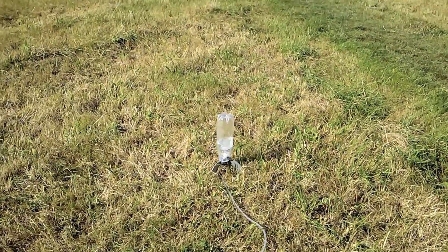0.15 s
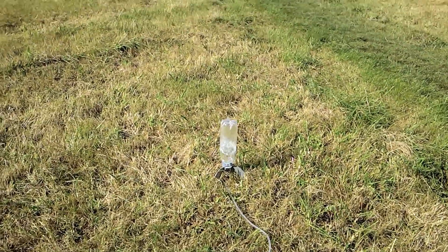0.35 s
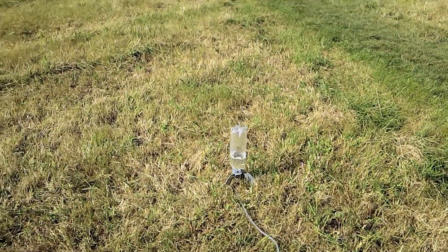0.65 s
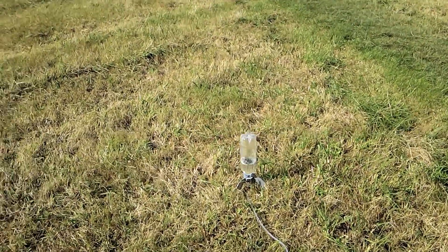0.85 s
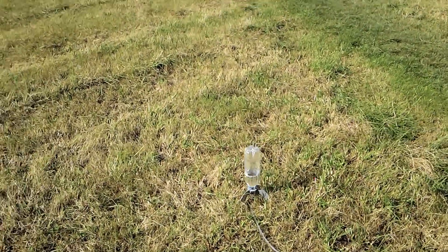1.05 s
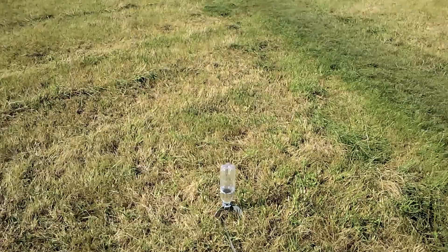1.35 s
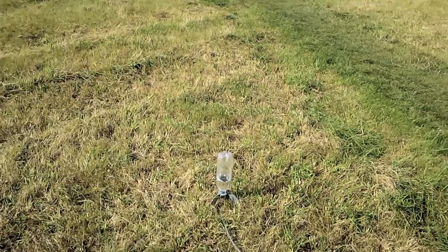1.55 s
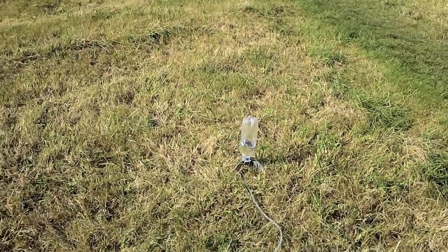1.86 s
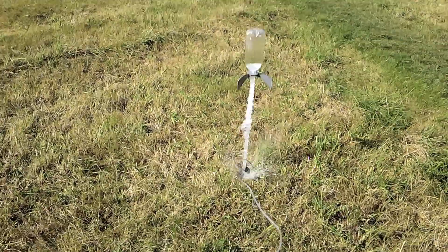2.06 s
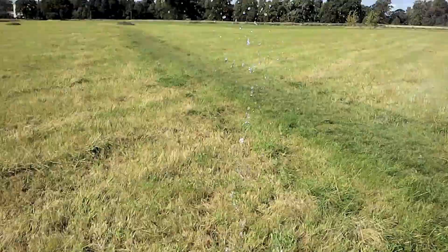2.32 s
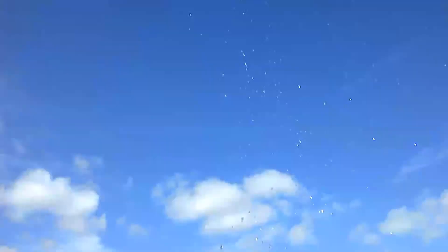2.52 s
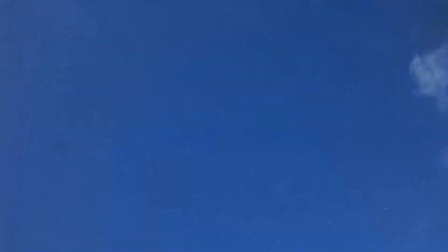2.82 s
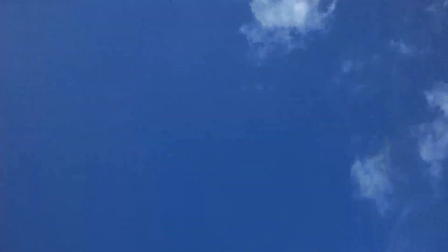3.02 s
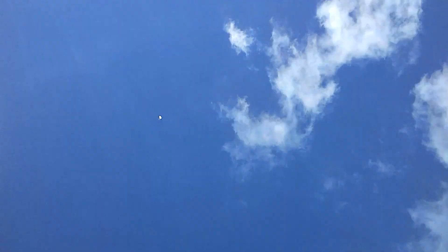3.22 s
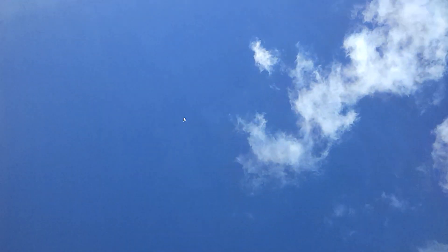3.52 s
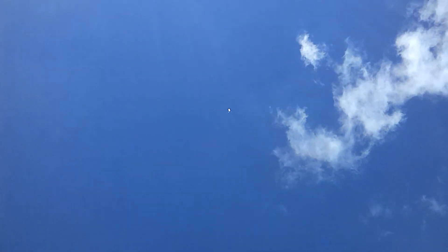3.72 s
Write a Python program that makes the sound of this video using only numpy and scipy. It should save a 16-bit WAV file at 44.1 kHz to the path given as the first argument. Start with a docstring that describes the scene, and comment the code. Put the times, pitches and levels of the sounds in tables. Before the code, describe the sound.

A water bottle rocket waits in a windy grass field with faint ticks and hisses, then pops loose with a split-second wet whoosh and spray patter; low wind keeps buffeting the close, unprotected microphone.

```python
"""A water rocket launches from a grass field while gusts buffet the microphone.
Throughout, filtered noise makes the wind and hissing grass, and short noise bursts make the thuds of eddies.
Hose and launcher tick, thin leaks hiss as gliding resonances, and the bottle neck creaks in tiny jerks.
At two seconds a pulse pops the bottle free amid a jet of water noise, then the last air blasts out,
both with a ground echo; a rain of tiny random hits is the spray, and two stray drops land close by."""
import sys
import numpy as np
from scipy import signal
from scipy.fft import rfft, irfft
from scipy.io import wavfile

SR = 44100
rng = np.random.default_rng(int(sys.argv[2]) if len(sys.argv) > 2 else 0)


def persist_wave(psi):
    """Save psi, clipped to +-1, as 16-bit WAV."""
    counts = np.round(np.clip(psi, -1, 1) * 32767).astype(np.int16)
    wavfile.write(sys.argv[1], SR, np.atleast_2d(counts).T)


N = 171108  # length in samples
T = np.arange(N) / SR  # time of each sample in seconds
POP_S = 2.0225  # moment the bottle pops free

# tone of small dry clicks, for grass crackles and launcher ticks: f/Hz, level/dB
CLICK_COLOUR = [(500,-7),(2200,10.5),(5000,2),(9000,-0.5),(15000,-21)]


def amp(db):
    """Turns decibels into a gain."""
    return 10 ** (np.asarray(db) / 20)


def unit(x):
    """Scales a sound to an rms (average strength) of 1."""
    return x / np.sqrt(np.mean(x ** 2) + 1e-20)


def level(points):
    """Gain over time, drawn through (t/s, level/dB) points."""
    return amp(np.interp(T, *np.transpose(points)))


def burst(points):
    """Gain over time like level, but practically silent outside its points."""
    return amp(np.interp(T, *np.transpose(points), left=-150, right=-150))


def colour(x, points):
    """Filters a sound to the spectrum in (f/Hz, level/dB) points, without ringing ahead of time."""
    f, db = np.transpose(points)
    hz = abs(np.fft.fftfreq(4096, 1 / SR))
    log_gain = np.log(amp(np.interp(np.log(hz + 1), np.log(f), db)))
    # the Hilbert transform finds the phase that puts the filter's energy as early as possible
    spectrum = np.exp(np.conj(signal.hilbert(log_gain)))
    taps = np.fft.ifft(spectrum).real
    return signal.fftconvolve(x, taps)[:len(x)]


def noise(points):
    """Coloured noise of rms 1."""
    return unit(colour(rng.standard_normal(N), points))


def wander(top_hz):
    """Random motion of rms 1, mostly slower than top_hz, with softly limited peaks."""
    hz = np.fft.rfftfreq(N, 1 / SR)
    drop_slowest = hz / (hz + top_hz / 4)
    drop_fastest = 1 / np.sqrt(1 + (hz / top_hz) ** 4)
    motion = irfft(rfft(rng.standard_normal(N)) * drop_slowest * drop_fastest, N)
    return unit(np.tanh(.5 * unit(motion)))


def resonate(x, hz, width_hz):
    """A steep resonance of rms 1 around hz, which may move."""
    turn = np.exp(2j * np.pi * np.cumsum(hz * np.ones(len(x))) / SR)
    pole = np.exp(-np.pi * width_hz / SR)
    # shift the resonance down to 0 Hz, smooth twice, shift it back up
    smoothed = signal.lfilter([1], np.poly([pole, pole]), x / turn)
    return unit((turn * smoothed).real)


def snap(points):
    """One sharp pressure pulse of peak 1."""
    pulse = colour(signal.unit_impulse(2048), points)
    return pulse / abs(pulse).max()


def add(mix, s, sound):
    """Mixes a sound in at time s, cutting what runs past the end."""
    part = mix[round(s * SR):][:len(sound)]
    part += sound[:len(part)]


def wind():
    """Turbulent eddies at the microphone make bass, rumble and flutter swell together."""
    # strength of the gusts: t/s, level/dB
    gusts = [(0,-15.5),(.07,-35),(.11,-22.5),(.33,-23),(.44,-24),(.93,-23),(1.09,-30.5),(1.38,-29.5),(1.49,-18),(1.62,-26),(1.77,-19),(1.87,-26),(1.98,-18.5),(2.05,-43.5),(2.23,-26.5),(2.53,-33.5),(2.7,-26),(2.81,-31),(3.0,-19.5),(3.26,-15.5),(3.6,-26),(3.69,-16),(3.88,-31.5)]
    # balance of the wind: t/s, deep bass before joint scaling/dB, flutter relative to rumble/dB
    wind_tone = [(.9,-6,-16),(1.9,-5,-25),(2.449,-2,-17.5),(3.249,-12.5,-14),(3.8,-13.5,-18)]
    # spectra of deep bass, rumble and flutter: f/Hz, level/dB
    deep_colour = [(30,-21),(70,13),(130,10),(1500,-94.5)]
    rumble_colour = [(25,-42),(65,-11),(130,1),(320,-6.5),(480,-17.5),(800,-42),(3200,-99.5)]
    flutter_colour = [(100,-9),(500,1),(750,-6.5),(1000,-15),(1600,-27.5),(2500,-40.5),(14000,-81.5)]
    eddy_hz, eddy_db = 33, 1.86  # speed of the eddies, depth in the rumble
    flutter_db, own_flutter_db, own_flutter_hz = 2.5, 2.5, 111  # depth with the eddies, depth and speed alone

    eddies = wander(eddy_hz)
    s, deep_tone_db, flutter_tone_db = np.transpose(wind_tone)
    deep = amp(np.interp(T, s, deep_tone_db)) * noise(deep_colour)
    rumble = unit((noise(rumble_colour) + deep) * amp(eddy_db * eddies))
    flutter_swing_db = flutter_db * eddies + own_flutter_db * wander(own_flutter_hz)
    flutter = unit(noise(flutter_colour) * amp(flutter_swing_db))
    return level(gusts) * (rumble + amp(np.interp(T, s, flutter_tone_db)) * flutter)


def grass():
    """Dry grass hisses and crackles faintly in the wind: steady noise plus sparse random clicks."""
    # strength of the hiss: t/s, level/dB
    hiss = [(.22,-55),(.43,-64),(.65,-58),(1.0,-57),(1.12,-60),(1.4,-56.5),(1.95,-57.5),(2.32,-68),(3.15,-64.5),(3.42,-67)]
    # spectrum of the hiss: f/Hz, level/dB
    hiss_colour = [(1200,8),(2300,-1.5),(3500,-0.5),(8500,-6),(11000,-13.5),(15500,-20.5)]
    crackles_per_s, crackle_db, spread_db = 90, -9.5, 3  # rate, level below the hiss, spread in strength

    happens = rng.random(N) < crackles_per_s / SR
    strength = amp(spread_db * np.minimum(rng.exponential(1, N), 3))
    crackle = unit(colour(happens * strength, CLICK_COLOUR))
    return level(hiss) * (noise(hiss_colour) + amp(crackle_db) * crackle)


def thuds():
    """Strong eddies hit the microphone: a quick push that dies away, brighter for small eddies."""
    # single eddies: t/s, level/dB, treble corner f/Hz
    buffets = [(.024,-18,660),(.246,-10.5,600),(.288,-15,360),(.338,-12,420),(.392,-21.5,640),(.574,-14.5,360),(.614,-15.5,440),(.663,-20,620),(.8,-20,520),(.884,-18.5,680),(.903,-19.5,720),(.987,-14,660),(1.02,-14.5,340),(1.265,-21,500),(1.325,-20,540),(1.475,-16,540),(1.55,-17,640),(1.679,-15.5,260),(1.72,-17,500),(1.756,-15.5,500),(1.823,-16,440),(1.89,-15.5,300),(1.951,-13,360),(2.426,-29,780),(2.671,-21,540),(2.691,-28,850),(3.135,-17.5,600),(3.275,-15.5,560)]
    # spectrum of an eddy: multiple of its corner frequency, level/dB
    buffet_colour = [(.07,-11),(.28,0),(1.05,-10.5),(6,-85)]
    peak_s = .0055  # time for the push to reach its peak

    out = np.zeros(N)
    u = np.arange(SR // 20) / SR / peak_s
    swell = u * np.exp(1 - u)
    for s, db, corner_hz in buffets:
        grit = swell * rng.standard_normal(len(u))
        push = colour(grit, np.multiply(buffet_colour, (corner_hz, 1)))
        # equal energy before the level is set, whatever the corner
        add(out, s, amp(db) * push * np.linalg.norm(swell) / np.linalg.norm(push))
    return out


def ticks():
    """Hose and launcher tick under pressure: a dry noise click plus a short ring, both dying away."""
    # ticks: t/s, level before the fade/dB, ring f/Hz
    tick_list = [(.166,-42,3630),(.176,-46,2100),(.264,-51,3700),(0.31,-47,6100),(.327,-51,9100),(0.513,-42,2000),(.593,-41,2650),(.638,-51,4500),(.679,-48.5,8500),(1.048,-45,4030),(1.165,-43.5,7400),(1.185,-51,8100)]
    rise_s, decay_s = 0.00084, 0.0037
    ring_width_hz, ring_db = 1090, -2.5  # ring level is relative to the click

    out, t = np.zeros(N), np.arange(SR // 20) / SR
    fade = np.minimum(t / rise_s, 1) * np.exp(-t / decay_s)
    for s, db, hz in tick_list:
        grit = rng.standard_normal(len(t))
        click = unit(colour(grit, CLICK_COLOUR))
        ring = amp(ring_db) * resonate(grit, hz, ring_width_hz)
        add(out, s, amp(db) * (click + ring) * fade)
    return out


def leaks():
    """Air escapes the pressurised launcher: thin hisses that glide in pitch and spit in strength."""
    # leaks: t/s, length/s, level before fades and spitting/dB, start f/Hz, end f/Hz
    leak_list = [(.69,0.35,-69.5,7150,7750),(.92,0.11,-61,2400,2080),(1.33,.08,-63,3020,3180)]
    width_hz, spit_db, spit_hz = 460, 4.0, 55  # width of each hiss, depth and speed of the spitting

    out = np.zeros(N)
    spits = unit(amp(spit_db * wander(spit_hz)))
    for s, length_s, db, start_hz, end_hz in leak_list:
        window = signal.windows.tukey(int(length_s * SR), .5)  # fades in and out
        glide_hz = np.linspace(start_hz, end_hz, len(window))
        hiss = resonate(rng.standard_normal(len(window)), glide_hz, width_hz)
        add(out, s, amp(db) * window * hiss * spits[round(s * SR):][:len(window)])
    return out


def creak():
    """The bottle neck slips on its seal in tiny jerks just before it lets go, exciting resonances."""
    # strength of the creak: t/s, level/dB
    creak_level = [(1.91,-67),(1.93,-51),(1.965,-54.5),(2.02,-56)]
    # resonances: f/Hz, level relative to each other/dB
    modes = [(1850,-1),(3900,-4.5),(5350,-3.5)]
    slips_per_s, width_hz = 900, 1400

    slips = (rng.random(N) < slips_per_s / SR) * rng.standard_normal(N)
    rings = sum(amp(db) * resonate(slips, hz, width_hz) for hz, db in modes)
    return burst(creak_level) * unit(rings)


def jet():
    """Pressure drives the water out: bright noise whose strength flickers quickly."""
    # strength before flicker and echo: t/s, level/dB
    jet_level = [(2.021,-41),(2.024,-30.5),(2.036,-28),(2.06,-33.5),(2.1,-34),(2.13,-52)]
    # spectrum: f/Hz, level/dB
    jet_colour = [(1800,-5),(3200,2.5),(4800,3),(9000,-6.5),(11500,-15.5),(15500,-22)]
    rough_db, rough_hz = -1.2, 400  # depth and speed of the flicker
    return burst(jet_level) * noise(jet_colour) * amp(rough_db * wander(rough_hz))


def ground_echo(exhaust):
    """The ground reflects jet and blast; the echo lags more as the bottle climbs."""
    start_s, growth_s_per_s = .00078, .0155  # lag at the pop, its growth per second
    share = .38  # echo gain relative to the direct sound
    lag = start_s + growth_s_per_s * np.maximum(T - POP_S, 0)
    echo = np.interp(T - lag, T, exhaust)
    return (exhaust + share * echo) / np.hypot(1, share)  # keeps the overall strength about equal


def pop():
    """The bottle comes free with a single sharp pressure pulse."""
    # spectrum: f/Hz, level/dB
    pop_colour = [(60,-19),(550,8),(1100,0.5),(1800,-15.5),(3100,-4),(4500,-1.5),(5800,-21),(7600,-8),(16000,-34)]
    out = np.zeros(N)
    add(out, POP_S, -amp(-2.8) * snap(pop_colour))  # peak of -2.8 dB, turned upside down
    return out


def blast():
    """The last air bursts out after the water: deeper noise that sputters."""
    # strength before sputter and echo: t/s, level/dB
    blast_level = [(2.04,-75),(2.069,-32),(2.082,-34),(2.097,-25),(2.106,-32.5),(2.113,-36),(2.13,-59)]
    # spectrum: f/Hz, level/dB
    blast_colour = [(100,-2),(450,4),(950,-3),(1400,0),(2200,-2.5),(2800,-6),(15500,-33)]
    sputter_db, sputter_hz = -3.0, 400  # depth and speed of the sputter
    return burst(blast_level) * noise(blast_colour) * amp(sputter_db * wander(sputter_hz))


def spray():
    """Many droplets hit the grass at random moments, in ragged surges."""
    # strength of the patter: t/s, level/dB
    spray_level = [(2.08,-50),(2.11,-38.5),(2.2,-37),(2.252,-33),(2.285,-46),(2.303,-64)]
    # spectrum: f/Hz, level/dB
    spray_colour = [(1300,-21),(2800,-8.5),(3900,-1.5),(4600,2),(5600,-6),(11500,-21),(15500,-27)]
    drops_per_s, surge_db, surge_hz = 12000, 1, 60  # rate, depth and speed of the surges

    hits = (rng.random(N) < drops_per_s / SR) * rng.standard_normal(N)
    surges = amp(surge_db * wander(surge_hz))
    return burst(spray_level) * unit(colour(hits * surges, spray_colour))


def stray_drops():
    """Stray drops land by the microphone, each one sharp pulse."""
    # drops: t/s, peak level/dB
    drop_list = [(2.474,-30.5),(2.964,-44.5)]
    # spectrum: f/Hz, level/dB
    drop_colour = [(2000,-21),(3700,-1),(6500,2),(16000,-40)]
    out = np.zeros(N)
    for s, db in drop_list:
        add(out, s, amp(db) * snap(drop_colour))
    return out


def scene():
    """Everything at one microphone in the open air."""
    field = wind() + grass() + thuds()
    waiting = ticks() + leaks() + creak()
    launch = ground_echo(jet() + blast()) + pop()
    falling_water = spray() + stray_drops()
    return (field + waiting + launch + falling_water)[None]


def record(dry):
    """The recorder's band limit: a steep filter removes what lies above its cutoff."""
    cut_hz = 15650
    taps = signal.firwin(511, cut_hz, window=("kaiser", 9), fs=SR)
    return signal.oaconvolve(dry, taps[None], "same")


dry = scene()
out = record(dry)
persist_wave(out)
```